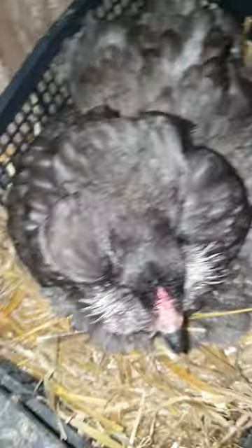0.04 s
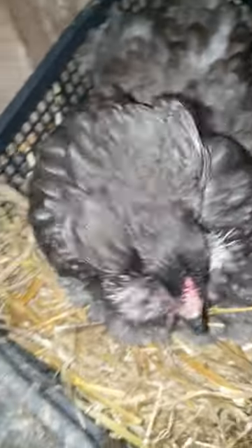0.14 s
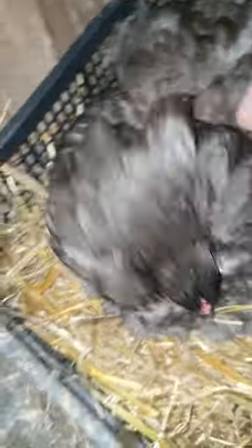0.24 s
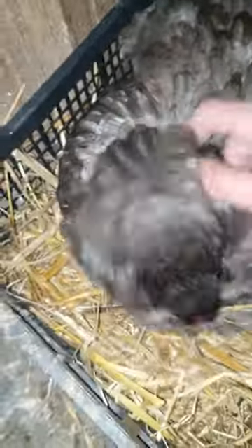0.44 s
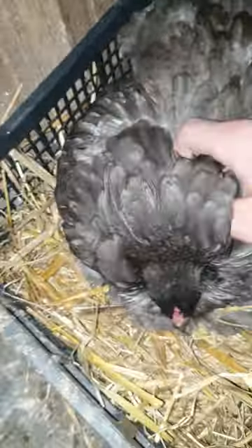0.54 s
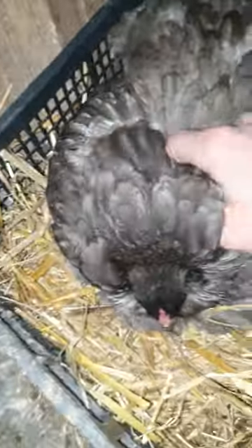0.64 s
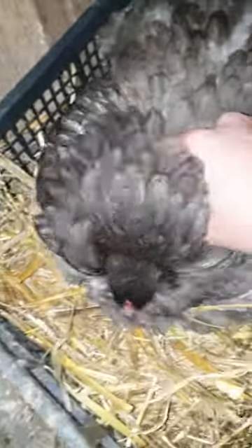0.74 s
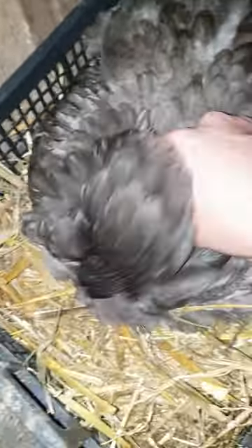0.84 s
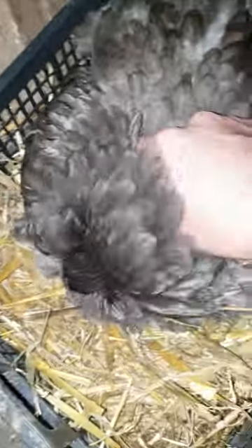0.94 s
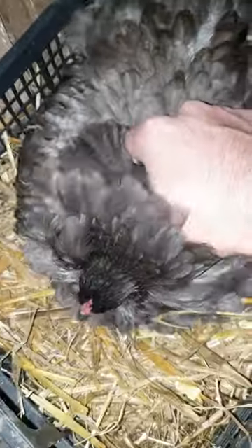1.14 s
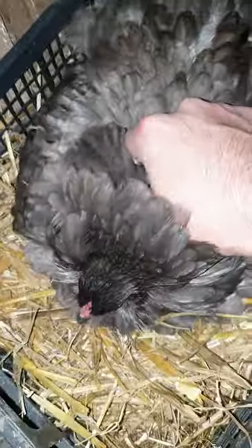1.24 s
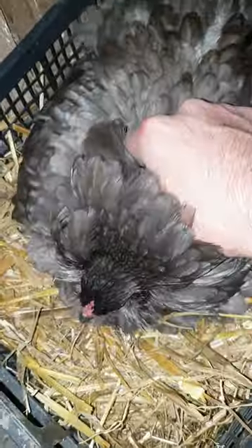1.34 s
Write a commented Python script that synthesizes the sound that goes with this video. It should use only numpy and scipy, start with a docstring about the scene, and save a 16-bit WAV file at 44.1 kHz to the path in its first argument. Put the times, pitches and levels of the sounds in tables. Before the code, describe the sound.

A nesting hen trills hoarsely, then gives one sharp cluck over softly brushing feathers.

```python
"""Broody hen in a shed

Close to a straw-lined crate, on a stereo pair of microphones. The hen growls as a hand reaches in:
her throat whistles a trill of short arched notes near 1 kHz, hoarse at first and then clean, then
pulses out one sharp cluck and a few soft notes. Feathers brush, straw ticks, the bedding bumps,
and the crate and the small shed answer over a faint low rumble."""
import sys
import numpy as np
from scipy import signal
from scipy.fft import rfft, irfft
from scipy.io import wavfile
from scipy.ndimage import uniform_filter1d

SR = 44100
rng = np.random.default_rng(int(sys.argv[2]) if len(sys.argv) > 2 else 0)


def unload_audio(sound):
    """Save the sound as a 16-bit wav file, at the path given as the first command line argument."""
    columns = np.transpose(np.atleast_2d(sound))
    # keep every value between -1 and 1, then stretch to whole-number steps
    steps = np.round(np.clip(columns, -1, 1) * 32767)
    wavfile.write(sys.argv[1], SR, steps.astype(np.int16))


N = 61739

# Throat rasp, heard in the growl and the cluck. Each row: frequency in Hz, relative level in dB.
RASP_SPECTRUM = [(100, -28.5), (250, -25), (450, -9.5), (600, -0.5), (800, 11.5), (1250, 0), (1600, -7.5),
                 (2100, -17), (2700, -24), (3400, -24), (4050, -16.5), (4800, -36), (8000, -53),
                 (16000, -48)]


def undb(db):
    """Decibels to amplitude."""
    return 10 ** (np.asarray(db) / 20)


def unit(x):
    """Scale to rms 1."""
    return x / np.sqrt(np.mean(x ** 2))


def curve(t, points):
    """Straight lines through (time, value) points."""
    return np.interp(t, *np.array(points).T)


def spectrum(points):
    """Interpolate (Hz, value) points onto the bins of a double-length transform."""
    hz, values = np.array(points).T
    bin_hz = np.arange(N + 1) * SR / (2 * N)
    return np.interp(np.log(bin_hz + 1), np.log(hz), values)


def colour(x, points):
    """Filter by a curve of (Hz, dB) points."""
    return irfft(rfft(x, 2 * N) * undb(spectrum(points)))[..., :N]


def noise(points):
    """Noise of rms 1 with the given spectrum."""
    return unit(colour(rng.standard_normal(N), points))


def smooth(x, seconds):
    """Two moving averages in a row."""
    size = max(int(seconds * SR), 1)
    return uniform_filter1d(uniform_filter1d(x, size), size)


def flutter(seconds):
    """Quick random motion of rms 1."""
    return unit(smooth(rng.standard_normal(N), seconds))


def pan(db):
    """Stereo gains with the left louder than the right by db."""
    return undb(np.array([[db], [-db]]) / 2)


def spread(make, likeness):
    """Stereo from two draws of a sound; likeness is the correlation of left and right."""
    mid = np.sqrt((1 + likeness) / 2) * make()
    side = np.sqrt((1 - likeness) / 2) * make()
    return np.array([mid + side, mid - side])


def strike(t, start, decay):
    """Sudden onset, exponential fall."""
    return (t >= start) * np.exp(-np.abs(t - start) / decay)


def rumble(t):
    """Low background, a little to the left and stronger while the hen turns."""
    # Each row: time in seconds, level in dB.
    levels = [(0, -64), (.05, -58.5), (.2, -54.5), (.32, -48.5), (.45, -62.5), (.6, -60.5), (.72, -65.5),
              (.9, -58.5), (1.15, -62.5), (1.25, -65), (1.4, -68.5)]
    # Each row: frequency in Hz, relative level in dB.
    timbre = [(20, -26), (35, -18), (55, 4), (110, -8), (170, 0), (240, -14.5), (400, -14), (700, -18),
              (1200, -22), (2000, -32), (3000, -27.5), (6000, -40.5), (16000, -51.5)]
    return undb(curve(t, levels)) * spread(lambda: noise(timbre), likeness=0.68) * pan(4)


def shed(x, t):
    """The shed answers with a short diffuse tail, the crate's corner with one hollow ring."""
    shed_t60_s, shed_delay_s, shed_db = .38, .02, -20
    crate_t60_s, crate_hz, crate_db = .31, 679, 1
    tail = rng.standard_normal((2, N)) * undb(-60 * t / shed_t60_s) * (t > shed_delay_s)
    tail = undb(shed_db) * unit(tail) / np.sqrt(N)
    fade = undb(-60 * t / crate_t60_s)
    ring = undb(crate_db) * 2 * fade / fade.sum() * np.sin(2 * np.pi * crate_hz * t)
    return signal.fftconvolve(x, tail + ring * pan(5), axes=1)[:, :N]


def crate_walls(voice, t):
    """First reflections off the crate, close enough to beat against the gliding tone."""
    # Each row: delay in seconds, left gain in dB, right gain in dB.
    reflections = [(.0031, -24, -37), (.0058, -40, -13), (.0094, -10, -29)]
    out = np.zeros((2, N))
    for delay, left_db, right_db in reflections:
        echo = np.interp(t - delay, t, voice, left=0)
        out += np.array([undb(left_db) * echo, undb(right_db) * echo])
    return out


def microphones(voice):
    """The hen reaches the two microphones with a level and phase that vary with frequency."""
    # Each row: frequency in Hz, left over right in dB.
    balance = [(500, -1), (660, 5), (800, 6), (890, 5), (980, -2), (1100, 0), (1500, 0), (2000, -1),
               (3800, -3.5), (8000, 0)]
    # Each row: frequency in Hz, lead of the left in radians.
    lead = [(200, 0), (500, .5), (700, 0), (800, -.15), (900, -.7), (1000, -.5), (1100, -.25), (1400, .2),
            (2000, -.2), (3800, .9), (8000, 0)]
    left_gain = undb(spectrum(balance) / 2) * np.exp(.5j * spectrum(lead))
    return irfft(rfft(voice, 2 * N) * np.array([left_gain, 1 / left_gain]))[:, :N]


def hand_rub(t):
    """A hand slides over the hen's back with a dull rub."""
    # Each row: time in seconds, level in dB.
    levels = [(0, -78.5), (1.05, -81.5), (1.19, -72.5), (1.215, -58), (1.28, -64), (1.4, -66)]
    # Each row: frequency in Hz, relative level in dB.
    timbre = [(60, -14.5), (150, -1.5), (225, 1), (330, -8), (500, -22.5), (900, -28), (3000, -52.5),
              (16000, -57.5)]
    return undb(curve(t, levels)) * noise(timbre)


def nest_bumps(t):
    """Soft knocks against the nest die quickly in the bedding."""
    # Each row: start in seconds, level in dB, decay in seconds.
    knocks = [(.183, -39, 0.0065), (1.208, -53, 0.0069)]
    # Each row: frequency in Hz, relative level in dB.
    timbre = [(40, -9), (170, 4), (300, -2.5), (500, -17.5), (800, -4.5), (1300, -24), (4000, -47.5),
              (16000, -49)]
    return noise(timbre) * sum(undb(db) * strike(t, start, decay) for start, db, decay in knocks)


def straw(t):
    """Dry stalks tick to either side as the hen shifts."""
    # Each row: start in seconds, level in dB, decay in seconds, left over right in dB.
    ticks = [(0.255, -54.5, 0.0091, 8.5), (0.381, -53.5, 0.0026, -5), (0.532, -56, 0.018, -1),
             (.544, -53.5, 0.008, 2), (0.58, -51, 0.003, -7), (.597, -54, .0015, -8),
             (0.795, -42.5, 0.0028, -2), (.8135, -34.5, 0.0011, 3), (0.891, -50, 0.0022, 9.5),
             (.985, -42.5, 0.0019, -3.5), (1.227, -54, 0.00092, 11.5), (1.322, -55, 0.0035, 2.5)]
    # Each row: frequency in Hz, relative level in dB.
    timbre = [(300, -23), (1000, -16.5), (2000, -6), (4500, 0), (7000, -1), (11000, 4), (16000, -6)]
    envelope = sum(undb(db) * strike(t, start, decay) * pan(side) for start, db, decay, side in ticks)
    return envelope * spread(lambda: noise(timbre), likeness=0.2)


def feathers(t):
    """Under the hand, barbs slide past one another in a dense spray of tiny clicks."""
    # Each row: time in seconds, level in dB.
    levels = [(0, -79), (.15, -77.5), (.25, -62), (.32, -65.5), (.38, -59.5), (.49, -70), (.55, -62),
              (.63, -69), (.70, -72.5), (.75, -65), (.80, -50.5), (.88, -56), (.96, -58.5), (1.04, -61.5),
              (1.11, -59), (1.27, -64), (1.33, -64), (1.4, -59)]
    # Each row: frequency in Hz, relative level in dB.
    timbre = [(900, -12), (1500, -8), (2800, -10.5), (4400, -5), (5500, -4), (6900, 1.5), (8200, -3),
              (10600, 1), (15500, -1.5)]

    def grains():
        spray = rng.standard_normal(N) * np.exp(0.38 * flutter(0.0014))
        return unit(colour(spray, timbre))
    return undb(curve(t, levels)) * spread(grains, likeness=0.17) * pan(2.5)


def murmurs(t):
    """Quiet, nearly pure notes with the beak closed, just after the cluck."""
    # Each row: start in seconds, length in seconds, pitch in Hz, level in dB.
    notes = [(0.875, 0.03, 668, -44.5), (0.925, 0.011, 702.5, -50.5), (0.939, 0.03, 903, -50.5),
             (0.965, 0.0078, 855.5, -40), (0.973, 0.011, 837, -43)]
    jitter = 0.02
    out = np.zeros(N)
    for start, length, hz, db in notes:
        phase = 2 * np.pi * np.cumsum(hz * (1 + jitter * flutter(0.0031))) / SR
        arch = np.sin(np.pi * np.clip((t - start) / length, 0, 1))
        out += undb(db) * arch * np.sin(phase)
    return out


def cluck(t):
    """Quickening pulses and a little air ring the throat; the cluck swells, cracks and is cut short."""
    # Throat resonances. Each row: frequency in Hz, relative gain in dB.
    throat = [(100, -19), (320, -22), (480, -21), (660, -13), (860, 0.5), (1050, -2.5), (1250, -17.5),
              (1650, -24.5), (2300, -32), (3300, -42), (4300, -42), (5500, -56), (16000, -72)]
    start_s, rise_s, fall_s, onset_level = .8425, .027, .0045, 0.388
    start_hz, climb_hz_per_s, jitter = 316, 1300, 0.056
    air_db, ring_hz = -7.5, 882.7
    crack_s, crack_width_s = .860, .006
    age = np.clip(t - start_s, 0, rise_s)
    pulse_hz = (start_hz + climb_hz_per_s * age) * (1 + jitter * flutter(0.0021))
    pulses = np.diff(np.floor(np.cumsum(pulse_hz) / SR), prepend=0)
    voice = unit(colour(pulses - pulses.mean(), throat)) + undb(air_db) * noise(throat)
    # The crate rings with a tone between the harmonics, swelling up to the peak.
    voice += undb(-2) * (age / rise_s) ** 2 * np.sin(2 * np.pi * ring_hz * t)
    swell = (t > start_s) * (onset_level + (1 - onset_level) * age / rise_s)
    release = np.exp(-np.maximum(t - start_s - rise_s, 0) / fall_s)
    crack = np.exp(-((t - crack_s) / crack_width_s) ** 2) * noise(RASP_SPECTRUM)
    return undb(-26.5) * smooth(swell * release, seconds=.001) * voice + undb(-35) * crack


def growl(t):
    """One whistling tone arches in pitch and level on each note; hoarse notes flutter, rasp, rattle."""
    # The trill; a note lasts until the next starts. Each row: start in seconds, top pitch in Hz,
    # level in dB before filtering, roughness (1 is full), closure at the note's ends (1 is shut).
    notes = [(.201, 866.4, -22.5, 0.06, 0.91), (0.214, 845, -15, 0.12, 0.8), (.231, 900.4, -17.5, 1.1, 0.8),
             (.238, 881.7, -13, 0.3, 0.6), (0.247, 862.2, -18.5, 0.5, 0.9), (0.261, 873.4, -27.5, 0.4, 0.5),
             (.273, 1062, -32.5, 0, 0.8), (0.29, 923, -15.5, .12, .7), (0.305, 908.6, -15, 0.5, 0.8),
             (.311, 919, -14, 0.1, 1), (0.324, 879, -34, 0.4, 0.7), (.345, 1005, -18.5, .12, 1),
             (0.363, 956.5, -14.5, 0.23, 0.7), (.380, 923, -17, .25, 1), (.391, 935, -35, .2, .8),
             (0.4, 1053, -31, 0.3, 1), (0.419, 1130, -17.5, 0.1, 0), (0.433, 1021, -14.5, 0.1, .2),
             (.453, 1106, -26.5, .1, 0.1), (0.473, 1151, -25, 0, 0.5), (0.491, 1107, -15.5, 0.08, .1),
             (.510, 1096, -20.5, 0, 0.1), (.529, 1065, -28, 0.2, 0.8), (0.548, 1045, -16.5, .07, 0.2),
             (0.564, 1111, -20, 0.2, 1), (0.578, 998.3, -61.5, .1, .9), (0.589, 1042, -35.5, 0.1, 1),
             (0.603, 1073, -24, .04, 0.9), (0.619, 1072, -39, 0.01, 1)]
    # Each row: multiple of the pitch, level in dB against the fundamental.
    overtones = [(2, -30), (3, -44.5)]
    # The throat weakens the tone's lowest swings. Each row: frequency in Hz, gain in dB.
    throat = [(200, -29), (450, -14), (680, -0.5), (16000, -2)]
    # Low rattle of the deeper, hoarser notes. Each row: frequency in Hz, relative level in dB.
    chest = [(80, -25), (170, -11), (260, -8), (380, -6), (490, 6.5), (590, -9), (690, 2), (900, -15),
             (1500, -31.5), (16000, -69.5)]
    end_s, swell_s, slew_s = .635, .004, .0022
    pitch_sag, jitter, shimmer, blur_rad = .25, 0.12, 0.19, .5
    beak_hz, beak_db_per_octave = 945, -13  # the tone weakens above this pitch
    chest_hz, chest_db_per_octave = 883, -59  # the rattle drops away above this one

    starts, top_hz, db, roughness, closure = np.array(notes).T
    position = np.interp(t, np.append(starts, end_s), np.arange(len(starts) + 1))
    note = np.minimum(position.astype(int), len(starts) - 1)
    progress = position - note  # 0 to 1 through each note
    arch = np.abs(np.sin(np.pi * progress)) ** .9
    opening = (1 - closure[note] + closure[note] * arch) * (t > starts[0]) * (t < end_s)
    envelope = smooth(undb(db)[note], swell_s) * smooth(opening, slew_s)
    hoarse = np.abs(smooth(np.clip(roughness, 0, 1)[note], slew_s))

    pitch = smooth(top_hz[note] * (1 - pitch_sag * np.abs(2 * progress - 1) ** 2.2), slew_s)
    phase = 2 * np.pi * np.cumsum(pitch * (1 + jitter * hoarse * flutter(0.0015))) / SR
    tone = np.sin(phase)
    for multiple, level in overtones:
        tone += undb(level) * np.sin(multiple * phase + blur_rad * flutter(.0016))
    beak_gain = undb(beak_db_per_octave * np.maximum(np.log2(pitch / beak_hz), 0))
    tremble = 1 + shimmer * hoarse * flutter(0.0017)
    whistle = colour(envelope * beak_gain * tone * tremble, throat)

    rasp = undb(-2) * hoarse ** 1.2 * noise(RASP_SPECTRUM)
    octaves_up = np.maximum(np.log2(top_hz[note] / chest_hz), 0)
    chest_gain = smooth(undb(-9 + chest_db_per_octave * octaves_up), swell_s)
    rattle = chest_gain * hoarse * noise(chest)
    return whistle + envelope * (rasp + rattle)


def scene():
    """The hen and her nest up close, with the shed and the rumble behind."""
    t = np.arange(N) / SR
    voice = growl(t) + cluck(t) + murmurs(t)
    hen = microphones(voice) + crate_walls(voice, t)
    near = hen + feathers(t) + straw(t) + nest_bumps(t) + hand_rub(t)
    return near + shed(near, t) + rumble(t)


def record(dry):
    """The recorder cuts the top treble with a steep low-pass."""
    top_hz = 15850
    return signal.sosfilt(signal.ellip(10, .2, 70, top_hz, fs=SR, output="sos"), dry)


dry = scene()
out = record(dry)
unload_audio(out)
```